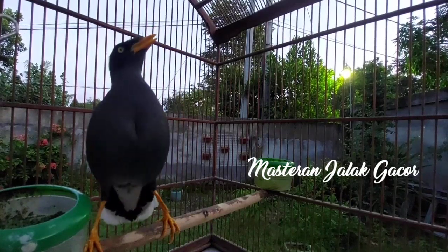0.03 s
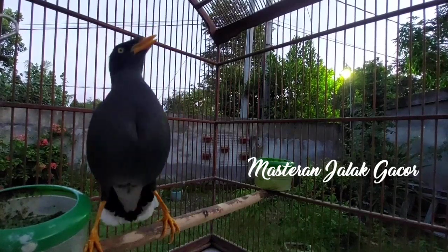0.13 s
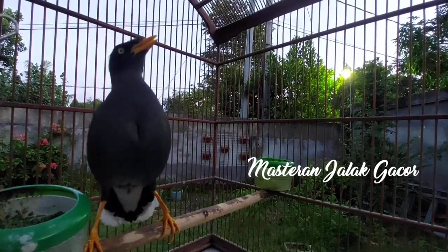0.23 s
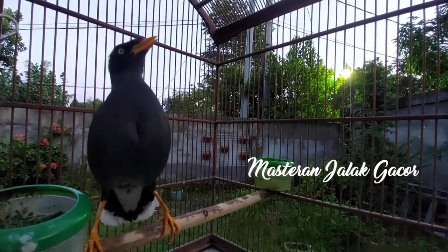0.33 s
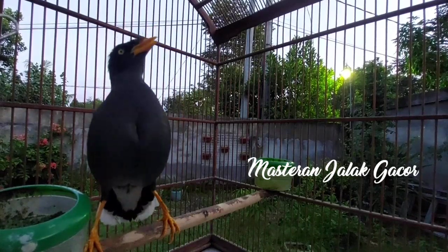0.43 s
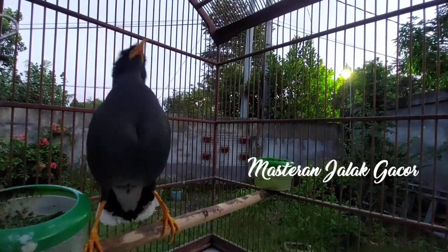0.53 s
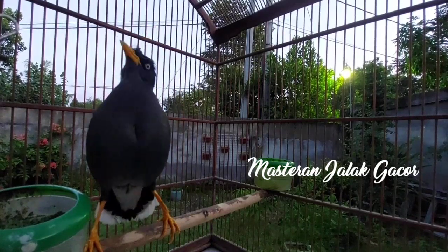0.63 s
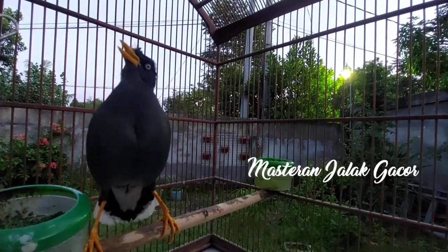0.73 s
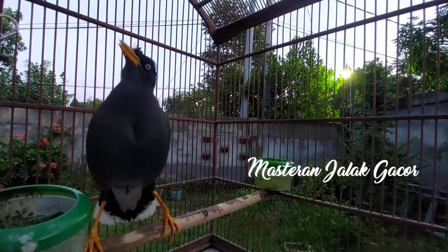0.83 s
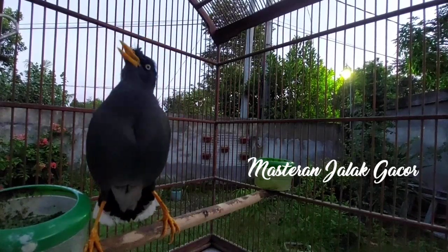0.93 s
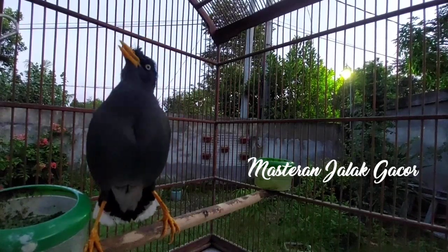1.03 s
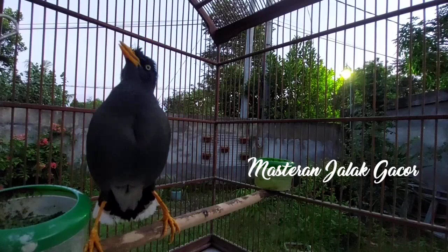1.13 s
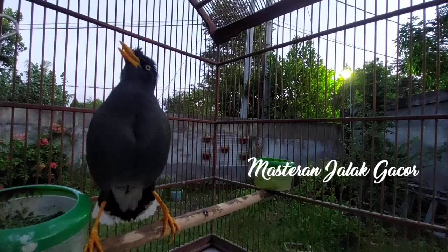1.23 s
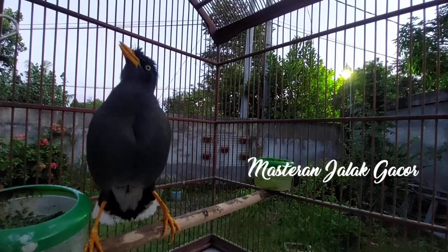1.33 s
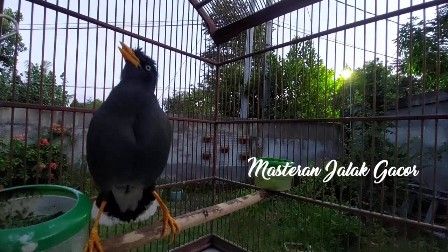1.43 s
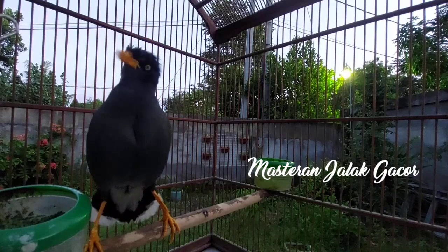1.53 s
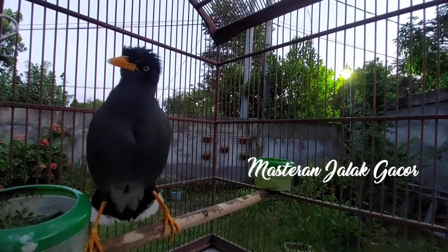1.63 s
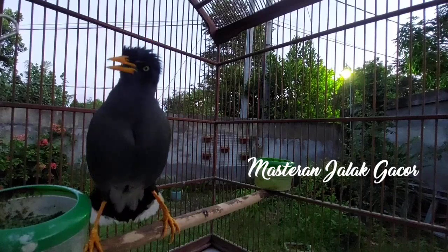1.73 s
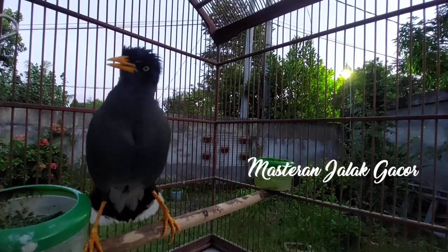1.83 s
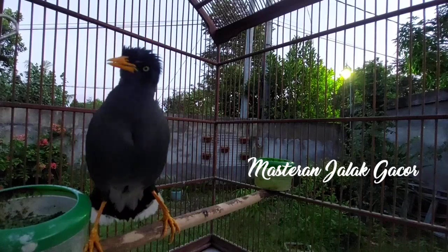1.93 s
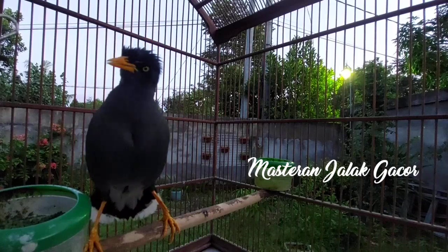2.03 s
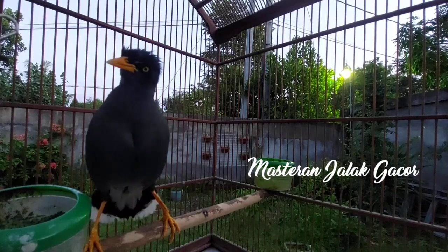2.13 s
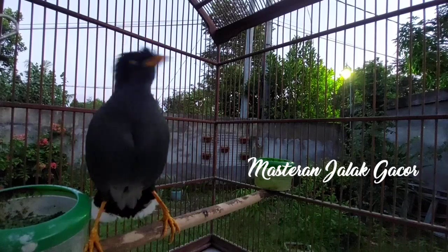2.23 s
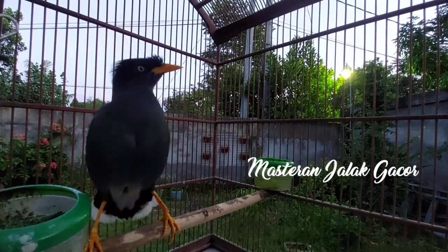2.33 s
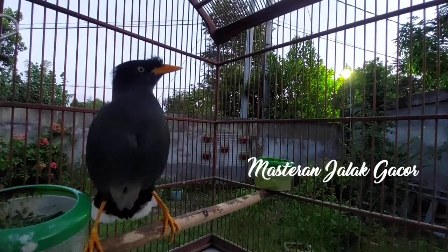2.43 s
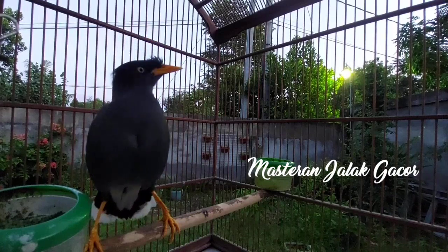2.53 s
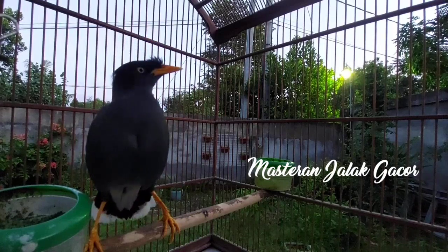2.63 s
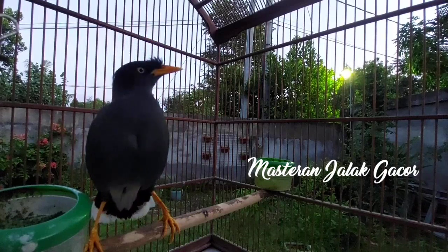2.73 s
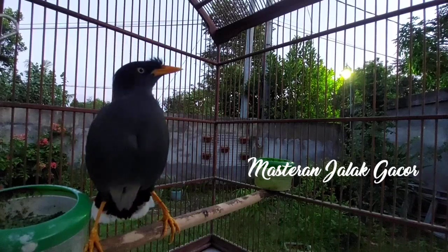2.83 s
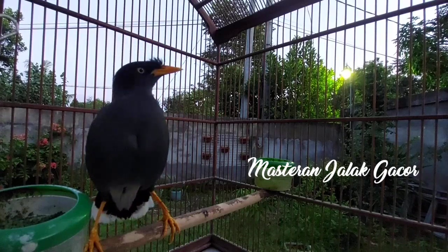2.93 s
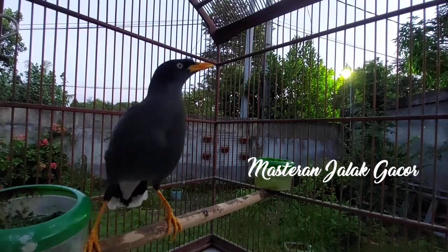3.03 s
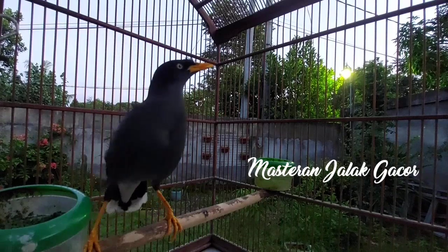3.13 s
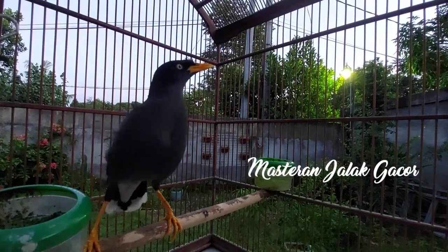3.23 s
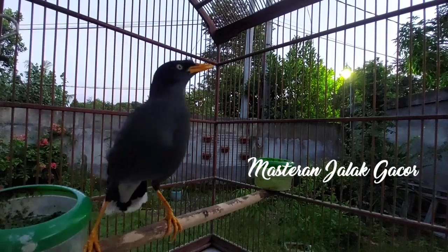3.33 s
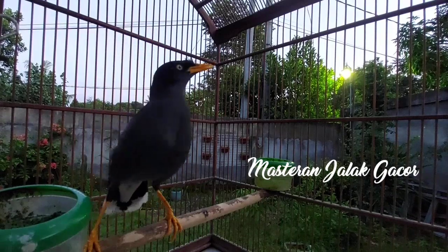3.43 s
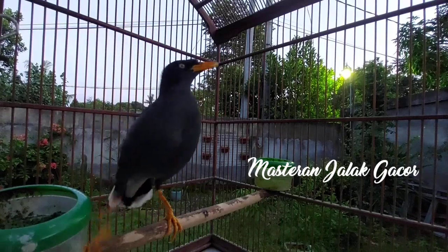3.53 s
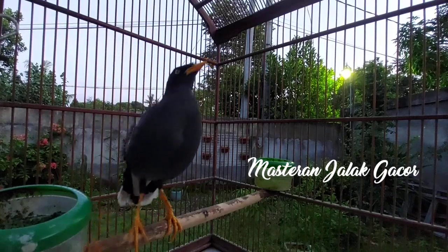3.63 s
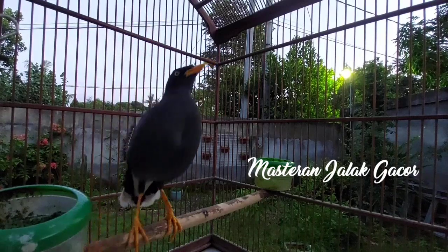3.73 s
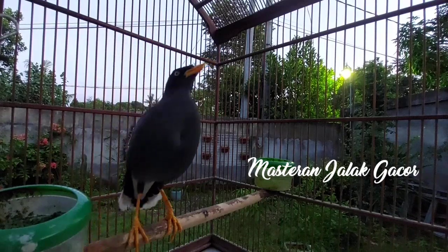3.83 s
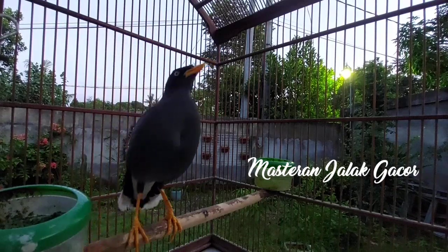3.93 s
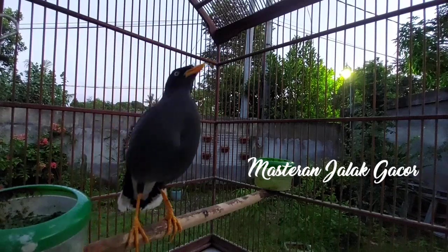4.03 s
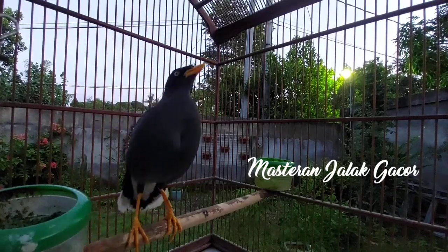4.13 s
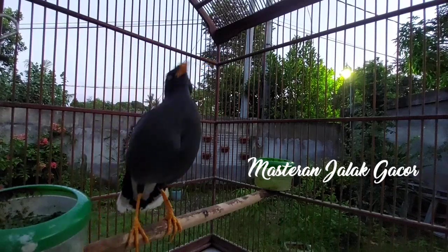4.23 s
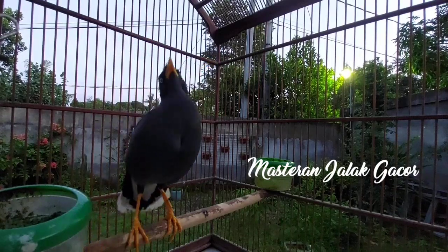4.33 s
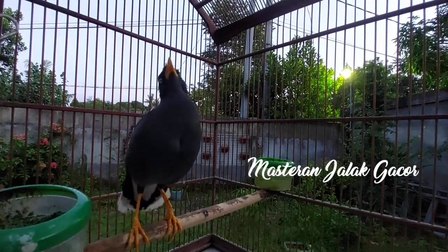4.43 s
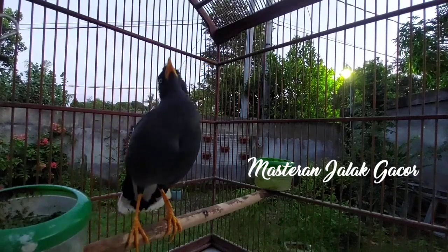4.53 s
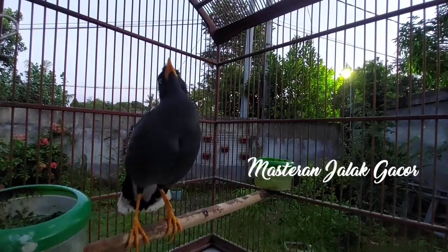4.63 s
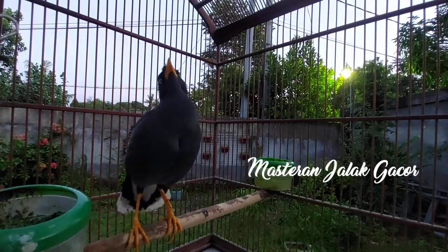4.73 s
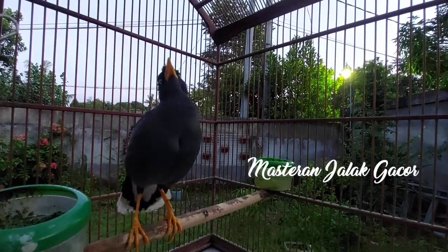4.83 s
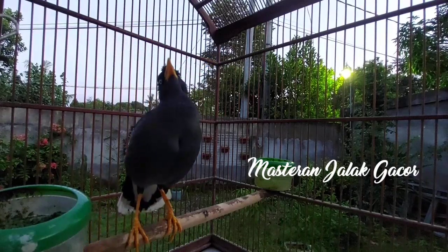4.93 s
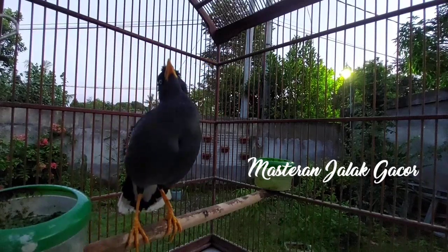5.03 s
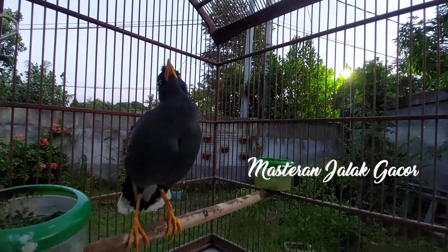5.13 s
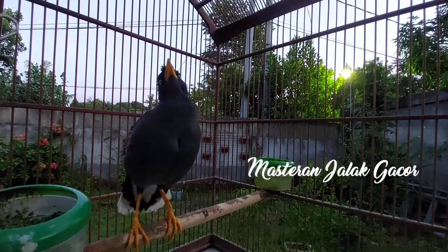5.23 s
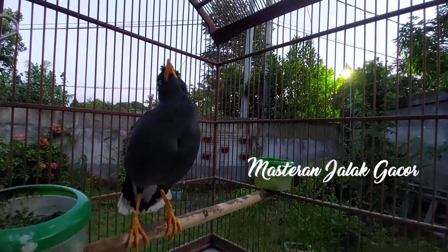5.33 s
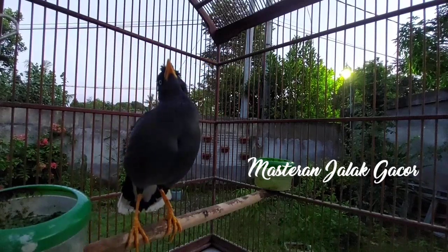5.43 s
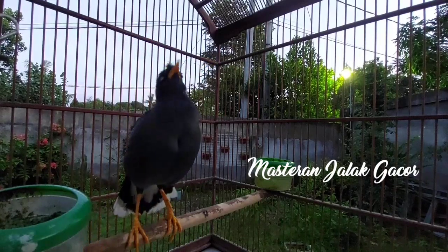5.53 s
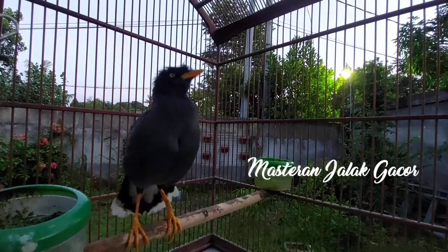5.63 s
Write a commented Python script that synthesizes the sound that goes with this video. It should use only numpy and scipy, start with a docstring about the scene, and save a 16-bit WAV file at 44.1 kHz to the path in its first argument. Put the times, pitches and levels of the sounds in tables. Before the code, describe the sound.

Close stereo pickup of a caged bird outdoors, with short echoes from cage and walls. Yelps and bright whistles fill the first two seconds, then there is a gap of over a second. Dry chucks, quick whistled notes and drawn nasal mews follow. The quiet background of high insect hiss, soft air and low rumble suddenly rises at the chucks, then eases; the cage knocks softly, later more clearly.

```python
"""Caged myna in a garden

A myna sings close by: a chip, yelps, flicks into falling whistles, rasping chucks, a run of quick
notes, two nasal mews. Each is a pitch glide that drives a harmonic buzz and breath through a throat.
The cage knocks twice as decaying modes plus rattle; random echoes answer bird and cage.
Behind: shaped noise for rumble, moving air, a sizzle and pulsed insect hiss, and a far motor of
wavering sines. Rumble, air, hiss and motor jump up just after 3 s.
"""
import sys
import numpy as np
from scipy import signal
from scipy.fft import rfft, irfft
from scipy.io import wavfile
from scipy.ndimage import uniform_filter1d

SR = 44100
rng = np.random.default_rng(int(sys.argv[2]) if len(sys.argv) > 2 else 0)


def materialize(psi):
    """Save the field psi as 16-bit PCM at rate SR to the path in sys.argv[1].

    A 1-D psi becomes a single channel; in a 2-D psi each row is a channel.
    """
    bounded = np.clip(np.atleast_2d(psi).T, -1, 1)
    quanta = np.round(bounded * 32767).astype(np.int16)
    wavfile.write(sys.argv[1], SR, quanta)


N = 250488
TIME = np.arange(N) / SR


def gain_of(db):
    """Decibels to amplitude."""
    return 10 ** (np.asarray(db) / 20)


def evened(x):
    """Scales to rms 1."""
    return x / np.sqrt(np.mean(x ** 2) + 1e-20)


def read(points, hz):
    """Reads a spectrum on a log-frequency axis."""
    f, value = np.transpose(points)
    return np.interp(np.log(hz + 1), np.log(f + 1), value)


def follow(rows, t):
    """Reads every column of a curve at the times t."""
    s, *columns = np.transpose(rows)
    return [np.interp(t, s, c) for c in columns]


def add(mix, s, sound):
    """Mixes a sound in at s seconds."""
    part = mix[max(round(s * SR), 0):][:len(sound)]
    part += sound[:len(part)]


def wander(size, hz):
    """Random motion of rms 1, mostly slower than hz."""
    f = np.fft.rfftfreq(size, 1 / SR)
    return evened(irfft(rfft(rng.standard_normal(size)) / np.sqrt(1 + (f / hz) ** 4), size))


def ease(t, start, end):
    """A smooth step from 0 to 1 between two times."""
    return np.sin(np.pi / 2 * np.clip((t - start) / (end - start), 0, 1)) ** 2


# flutter spells: (from [s], to [s], rate [beats/s], depth [0-1])
FLUTTERS = [(.113, .275, 58.1, .9), (4.13, 4.19, 58, 1)]


def flutter(t):
    """The level beats many times a second, dipping to nothing between beats at depth 1."""
    gain = np.ones(len(t))
    for start, end, rate, depth in FLUTTERS:
        beat = np.sqrt(2) * abs(np.sin(np.pi * rate * (t - start)))
        spell = np.clip(np.minimum(t - start, end - t) / .003, 0, 1)
        gain += depth * (beat - 1) * spell
    return uniform_filter1d(gain, size=60)


def note(t, hz, db, throat, jitter, shimmer, puff_db, rasp_hz):
    """The syrinx buzzes through the throat; as it slackens below rasp_hz its cycles turn uneven."""
    size = len(t)
    rasp = np.clip((rasp_hz - hz) / 110, 0, 1)
    beating = flutter(t)
    # the pitch shakes, most where it slides fast
    slide = np.clip(abs(np.gradient(np.log(hz))) * SR / 20, 0, 1) ** 2
    hz = hz * (1 + (jitter + .018 * slide + .06 * rasp) * wander(size, 600))
    # each beat bends the pitch, unevenly
    hz = hz * (1 + .03 * (beating - 1) * (1 + wander(size, 200)))
    phase = 2 * np.pi * np.cumsum(hz) / SR

    k = np.arange(1, 19)[:, None]
    overtone = k > 1
    # soft blowing and fast slides dull the overtones; high ones flicker one by one
    high = np.clip((k * hz - 3500) / 5000, 0, 1) * overtone
    flicker_db = 3.62 * np.array([wander(size, 49) for _ in k])
    soft_db = 0.36 * (db - db.max())
    heights_db = read(throat, k * hz) + high * (soft_db + flicker_db) - 10 * slide * overtone
    heights = gain_of(heights_db) * (k * hz < SR / 2)
    heights /= np.sqrt((heights ** 2).sum(0) / 2)
    buzz = (heights * np.cos(k * phase + rng.uniform(0, 2 * np.pi, k.shape))).sum(0)
    # strong and weak cycles put half lines between the harmonics
    uneven = 0.5 * rasp * wander(size, 390) * np.cos(phase / 2)
    buzz *= 1 + (shimmer + .12 * slide) * wander(size, 130) + uneven

    # air hisses through once a cycle
    throat_gain = gain_of(read(throat, np.fft.rfftfreq(size, 1 / SR)))
    puff = evened(irfft(rfft(rng.standard_normal(size)) * throat_gain, size))
    puff *= (gain_of(puff_db) + .28 * rasp) * (1 + np.cos(phase))
    puff = signal.sosfilt(signal.butter(3, 1400, "highpass", fs=SR, output="sos"), puff)
    return (buzz + puff) * beating * gain_of(db)


# left over right as the bird turns its head: (time [s], level [dB])
LEAN = [(.2, 4), (.8, 5.5), (1.3, 5.5), (1.7, 7.5), (3.2, 3.5), (3.9, 3.5), (4.3, 3), (4.6, 5), (5.3, 3.5)]


def phrase(gesture, notes, throat, lead_ms, jitter, shimmer, puff_db, rasp_hz=0):
    """Notes of one kind; the bird stands to the left, so that side hears it sooner and louder."""
    voice = np.zeros(N)
    for row in notes:
        add(voice, row[0], note(*gesture(*row), throat, jitter, shimmer, puff_db, rasp_hz))
    late = np.roll(voice, round(lead_ms * SR / 1000))
    left = gain_of(follow(LEAN, TIME)[0])
    return np.array([left * voice, late]) / np.sqrt((left ** 2 + 1) / 2)


def envelope(t, length, attack_s, release_s):
    """The airflow opens, holds and closes (dB)."""
    return 20 * np.log10(ease(t, 0, attack_s) * ease(length - t, 0, release_s) + 1e-4)


def swoop(t, first_hz, top_hz, rise_s):
    """The syrinx tightens: the pitch climbs fast and levels off at its top."""
    return top_hz - (top_hz - first_hz) * np.clip(1 - t / rise_s, 0, 1) ** 2


def settle(t, first_hz, rest_hz, settle_s, wobble):
    """The syrinx relaxes: the pitch falls fast and unsteadily, then creeps to its rest."""
    fall = np.exp(-t / settle_s) * (1 + wobble * wander(len(t), 93))
    return rest_hz + (first_hz - rest_hz) * fall


def weak_spot(hz, centre_hz, width_hz):
    """From 0 to 1: how near a gliding note is to the pitch at which it carries poorly."""
    return np.exp(-((hz - centre_hz) / width_hz) ** 2)


# whistles: (start [s], length [s], plunge above glide [Hz], glide start [Hz], rest before sag [Hz],
#            base level [dB], crest after start [s], fade either side of crest [dB/s], accent [dB])
WHISTLES = [(.111, 0.26, -1, 3420, 2835, -14.5, 0.14, 42, -10),
            (1.536, 0.13, 1899, 3995, 2910, -10, 0.062, 148.5, 3),
            (1.824, 0.1343, 1699.5, 4480, 2863, -8.5, 0.059, 185, 7.5)]
# throat and beak, also for flicks: (frequency [Hz], relative level [dB])
WHISTLE_THROAT = [(2800, 5.5), (4000, -14.5), (5700, -31.5), (7600, -19), (8700, -42), (14500, -47)]


def whistle(start, length, plunge_hz, first_hz, rest_hz, db, crest_s, fade_db_per_s, accent_db,
            plunge_s=0.0047, settle_s=.022, sag_hz_per_s=330, accent_s=0.0068, dip_db=4.0,
            attack_s=0.0089, release_s=0.017):
    """The pitch plunges and settles, then sags; the onset is accented and the level peaks at a crest."""
    t = np.arange(0, length, 1 / SR)
    glide = settle(t, first_hz, rest_hz, settle_s, wobble=0.05)
    hz = glide + plunge_hz * np.exp(-(t / plunge_s) ** 2) - sag_hz_per_s * t
    swell = accent_db * np.exp(-t / accent_s) - fade_db_per_s * abs(t - crest_s)
    swell -= dip_db * weak_spot(hz, centre_hz=3250, width_hz=180)
    return start + t, hz, db + swell + envelope(t, length, attack_s, release_s)


# flicks just before a whistle: (start [s], length [s], top pitch [Hz], level [dB])
FLICKS = [(1.517, 0.021, 5500, -32.5), (1.801, .02, 6330, -30)]


def flick(start, length, top_hz, db, first_hz=3600, attack_s=0.0057, release_s=0.0091):
    """A thin, straight sweep upward."""
    t = np.arange(0, length, 1 / SR)
    hz = first_hz + (top_hz - first_hz) * t / length
    return start + t, hz, db + envelope(t, length, attack_s, release_s)


# quick notes: (start [s], length [s], first pitch [Hz], rest pitch [Hz], base level [dB],
#               crest after start [s], fade either side of crest [dB/s])
QUICK_NOTES = [(4.095, 0.014, 1712, 1700, -31.5, .008, 100), (4.107, 0.087, 3460, 2236, -8.5, 0.042, 330),
               (4.218, 0.094, 3444, 2256, -8, 0.029, 216), (4.329, 0.091, 3400, 2300, -10.5, 0.037, 152.5),
               (4.44, 0.1, 3376, 2220, -13, 0.018, 70), (4.568, 0.088, 3250, 2230, -13.5, 0.032, 103)]
# throat and beak: (frequency [Hz], relative level [dB])
QUICK_THROAT = [(2300, 6), (2650, -9.5), (3200, 1), (4550, -20.5), (5900, -26), (6900, -23.5), (9200, -37),
                (14000, -40)]


def quick_note(start, length, first_hz, rest_hz, db, crest_s, fade_db_per_s, settle_s=.0145,
               strain_db_per_octave=7, dip_db=4, attack_s=0.0078, release_s=0.01284):
    """A short falling whistle, weaker while its pitch is still high."""
    t = np.arange(0, length, 1 / SR)
    hz = settle(t, first_hz, rest_hz, settle_s, wobble=.1)
    swell = -strain_db_per_octave * np.log2(hz / rest_hz) - fade_db_per_s * abs(t - crest_s)
    swell -= dip_db * weak_spot(hz, centre_hz=2656, width_hz=77)
    return start + t, hz, db + swell + envelope(t, length, attack_s, release_s)


# yelps: (start [s], length [s], top pitch [Hz], rise [s], final drop [Hz], level [dB])
YELPS = [(.560, 0.079, 1226, .064, 2, -14.5), (0.801, 0.076, 1187, .056, 31, -16),
         (1.02, .09, 1178, .069, 26, -14.5), (1.265, .079, 1195, .049, 94.5, -13.5)]
# throat and beak: (frequency [Hz], relative level [dB])
YELP_THROAT = [(700, -4), (1200, -20.5), (1800, -5.5), (2400, -1), (3600, 0.5), (4800, -13), (5900, -17),
               (7100, -12), (9500, -30), (15000, -23.5)]


def yelp(start, length, top_hz, rise_s, drop_hz, db, first_hz=630, release_s=0.023):
    """Swells while the pitch climbs, then shuts quickly as the pitch drops."""
    t = np.arange(0, length, 1 / SR)
    hz = swoop(t, first_hz, top_hz, rise_s) - drop_hz * ease(t, length - release_s, length)
    return start + t, hz, db + envelope(t, length, length - release_s, release_s)


# mews: (start [s], length [s], first pitch [Hz], top pitch [Hz], base level [dB])
MEWS = [(4.846, 0.21, 1563, 2046, -20.5), (5.201, 0.24, 1430, 2092, -18.5)]
# throat and beak: (frequency [Hz], relative level [dB])
MEW_THROAT = [(1650, 17), (2050, -14.5), (3500, 10.5), (4100, -1), (5200, 3), (6150, -4.5), (7200, -3.5),
              (8200, -5.5), (10000, -20.5), (12400, -23), (14500, -27)]


def mew(start, length, first_hz, top_hz, db, rise_s=0.09, end_hz=1745, sink_from=0.4, sink_to=0.99,
        attack_s=.015, swell_db=20, swell_s=.066, droop_db=5.0, release_s=0.031):
    """Starts softly and swells as it climbs, then sinks; the level droops with the pitch."""
    t = np.arange(0, length, 1 / SR)
    sink = ease(t / length, sink_from, sink_to)
    hz = swoop(t, first_hz, top_hz, rise_s) + (end_hz - top_hz) * sink
    swell = swell_db * (ease(t, attack_s, swell_s) - 1) - droop_db * sink
    return start + t, hz, db + swell + envelope(t, length, attack_s, release_s)


# chucks: (start [s], length [s], held pitch [Hz], end pitch [Hz], level before fade [dB])
CHUCKS = [(3.15, 0.0729, 1484, 1167, -25), (3.371, 0.084, 1519, 1196, -20.5),
          (3.622, .076, 1560, 1098, -17), (3.872, 0.074, 1490, 1085, -18.5)]
# throat and beak: (frequency [Hz], relative level [dB])
CHUCK_THROAT = [(1100, -9.5), (1520, -4), (2400, 5.5), (3050, 3), (4500, -14.5), (6000, -22), (7500, -21.5),
                (15000, -48)]


def chuck(start, length, held_hz, end_hz, db, sink_from=.25, sink_to=.9, attack_s=0.019,
          fade_db_per_s=45, release_s=0.027):
    """Holds its pitch for the first part of its length, then sinks."""
    t = np.arange(0, length, 1 / SR)
    hz = held_hz + (end_hz - held_hz) * ease(t / length, sink_from, sink_to)
    fade = fade_db_per_s * np.maximum(t - attack_s, 0)
    return start + t, hz, db + envelope(t, length, attack_s, release_s) - fade


# chip: (start [s], length [s], top pitch [Hz], level before fade [dB])
CHIPS = [(0.019, .07, 2172, -24)]
# throat and beak: (frequency [Hz], relative level [dB])
CHIP_THROAT = [(1400, -15), (2150, 2), (4200, 4.5), (6600, -27), (15000, -48)]


def chip(start, length, top_hz, db, first_hz=1300, rise_s=.017, sag_hz_per_s=2600,
         attack_s=0.0081, fade_db_per_s=340, release_s=.01):
    """A snap upward that sags and dies away."""
    t = np.arange(0, length, 1 / SR)
    hz = swoop(t, first_hz, top_hz, rise_s) - sag_hz_per_s * np.maximum(t - rise_s, 0)
    fade = fade_db_per_s * np.maximum(t - attack_s, 0)
    return start + t, hz, db + envelope(t, length, attack_s, release_s) - fade


# knocks on the cage: (time [s], base level [dB])
KNOCKS = [(3.163, -33), (5.617, -24)]
# cage modes: (frequency [Hz], relative level [dB], t60 [s])
CAGE = [(289, -15.5, 0.59), (604, -10.5, 0.12), (873, 2.5, 0.06), (1077, -7.5, 0.1), (1657, 3.5, 0.031),
        (2260, -3, 0.029), (7230, -2, 0.025)]


def knocks(rattle_db=-3, rattle_t60_s=0.15, low_hz=380, high_hz=3200, left_db=2):
    """Each knock rings the cage's modes, with a short noisy rattle of the bars."""
    out, t = np.zeros((2, N)), np.arange(SR // 3) / SR
    band = signal.butter(2, [low_hz, high_hz], "bandpass", fs=SR)
    for s, db in KNOCKS:
        ring = sum(gain_of(level - 60 * t / t60) * np.sin(2 * np.pi * (hz * t + rng.random()))
                   for hz, level, t60 in CAGE)
        for side, lean_db in zip(out, (left_db, 0)):
            rattle = evened(signal.lfilter(*band, rng.standard_normal(len(t))))
            rattle *= gain_of(rattle_db - 60 * t / rattle_t60_s)
            add(side, s, gain_of(db + lean_db) * (ring + rattle) * np.minimum(t / .002, 1))
    return out


# garden ring time: (frequency [Hz], t60 [s])
GARDEN = [(500, .45), (2500, 0.38), (15000, .2)]


def garden(x, near_db=-23, near_t60_s=0.045, far_db=-24.5):
    """Quick echoes off the cage and its tray, then a thin tail from walls and trees."""
    t = np.arange(SR) / SR
    sparse = rng.random((2, SR)) < 2500 / SR
    taps = rng.standard_normal((2, SR)) * sparse * (t > .002)
    near = taps * gain_of(-60 * t / near_t60_s)
    hz, s, z = signal.stft(taps * (t > .015), SR, nperseg=256)
    decay = gain_of(-60 * s / read(GARDEN, hz)[:, None])
    far = signal.istft(z * decay, SR, nperseg=256)[1][:, :SR]
    echoes = gain_of(near_db) * near / np.linalg.norm(near[0])
    echoes += gain_of(far_db) * far / np.linalg.norm(far[0])
    # the left side feeds both echo channels
    return signal.fftconvolve(x[:1], echoes, axes=1)[:, :N]


# backgrounds between the ears: (frequency [Hz], correlation [-1 to 1])
LIKENESS = [(100, 0.82), (300, .85), (800, -0.17), (2000, 0)]


def background(spectrum, level, patchy_db, lines_db, left_db):
    """Shaped noise with drifting patches and thin lasting tones, partly alike in both ears."""
    hz = np.fft.rfftfreq(2048, 1 / SR)
    a, b, c, d, patches, lines = rng.standard_normal((N // 512 + 5, len(hz), 6)).T
    patches = evened(smear(patches, 14, 5))
    lines = evened(smear(lines, 2, 60))
    same, left = np.clip(read(LIKENESS, hz), -1, 1)[:, None], a + 1j * b
    right = same * left + np.sqrt(1 - same ** 2) * (c + 1j * d)
    z = np.array([left * gain_of(left_db), right])
    z *= gain_of(read(spectrum, hz)[:, None] + patchy_db * patches + lines_db * lines)
    noise = signal.istft(z, nperseg=2048, noverlap=1536)[1][:, :N]
    return gain_of(follow(level, TIME)[0]) * evened(noise)


def smear(grid, bins, frames):
    """Smooths a noise grid over frequency bins and time frames."""
    return uniform_filter1d(uniform_filter1d(grid, size=bins, axis=0), size=frames, axis=1)


# insect hiss spectrum: (frequency [Hz], relative level [dB])
HISS = [(5000, -48), (6800, -21), (7450, -1), (8200, -17.5), (9500, -17.5), (10900, 2.5), (12100, -20.5),
        (12700, -53), (15000, -34.5)]
# (time [s], level [dB])
HISS_LEVEL = [(0, -53.5), (1.901, -57.5), (3.08, -59.5), (3.2, -49.5), (4, -52), (4.8, -57.5),
              (5.68, -57.5)]


def insects(depth=0.51, strokes_per_s=138.8):
    """The high hiss comes in fast strokes, as from a scraping insect."""
    strokes = np.cumsum(strokes_per_s * (1 + .004 * wander(N, 3))) / SR
    beat = 1 + depth * np.cos(2 * np.pi * strokes)
    return evened(beat) * background(HISS, HISS_LEVEL, patchy_db=-2.5, lines_db=0.5, left_db=9.5)


# sizzle spectrum: (frequency [Hz], relative level [dB])
SIZZLE = [(3500, -31), (5200, -4), (7200, 4), (9500, -24)]
# (time [s], level [dB])
SIZZLE_LEVEL = [(0, -53.5), (1.9, -54.5), (3.099, -61), (5.68, -67)]


def sizzle():
    """Unpulsed treble noise with thin tones, fading over the scene."""
    return background(SIZZLE, SIZZLE_LEVEL, patchy_db=1.5, lines_db=4.5, left_db=0)


# moving-air spectrum: (frequency [Hz], relative level [dB])
AIR = [(100, 4.5), (900, 2), (2600, -3.5), (4000, -5.5), (9500, -19), (13500, -35), (15000, -32)]
# (time [s], level [dB])
AIR_LEVEL = [(0, -53), (1.9, -60.5), (2.3, -69), (3.08, -68.5), (3.179, -45.5), (4, -49), (4.75, -57),
             (5.68, -57.5)]


def air():
    """Moving air: broad noise that falls off toward the treble."""
    return background(AIR, AIR_LEVEL, patchy_db=2, lines_db=1, left_db=1)


# rumble spectrum: (frequency [Hz], relative level [dB])
RUMBLE = [(20, -39), (45, -23.5), (65, 4.5), (130, -7), (260, -14.5), (350, -6), (450, -20.5), (700, -12.5),
          (1500, -40)]
# (time [s], level [dB])
RUMBLE_LEVEL = [(0, -50), (1.6, -44.5), (2.6, -50), (3.079, -48), (3.181, -41.5), (4.1, -41),
                (4.599, -48.5), (5.68, -47)]


def rumble():
    """Low noise, strongest near 65 Hz."""
    return background(RUMBLE, RUMBLE_LEVEL, patchy_db=2, lines_db=4.5, left_db=1.3)


# far motor: (time [s], firing rate [Hz], level [dB])
MOTOR = [(1.2, 62.62, -54.5), (3.08, 64, -63), (3.2, 69.5, -40.5), (4, 69.84, -41), (4.7, 67.06, -48.5),
         (5, 102.9, -52.5), (5.3, 94.5, -49.5), (5.68, 103.5, -50.5)]
# partials: (multiple of firing rate, relative level [dB])
MOTOR_ORDERS = [(1, 0.5), (2, -6.5), (2.5, -16)]


def motor(waver=0.014, throb=.25):
    """The low orders of a far engine, wavering in pitch and level."""
    hz, db = follow(MOTOR, TIME)
    phase = 2 * np.pi * np.cumsum(hz * (1 + waver * wander(N, 5.5))) / SR
    hum = sum(gain_of(level) * np.sin(k * phase) * (1 + throb * wander(N, 6.83))
              for k, level in MOTOR_ORDERS)
    return gain_of(db) * evened(hum)


def scene():
    """The bird and its cage in the garden."""
    near = knocks()
    for gesture, notes in (whistle, WHISTLES), (flick, FLICKS):
        near += phrase(gesture, notes, WHISTLE_THROAT, lead_ms=0.23, jitter=0.00059, shimmer=.03,
                       puff_db=-50.5)
    near += phrase(quick_note, QUICK_NOTES, QUICK_THROAT, lead_ms=0.13, jitter=0.001, shimmer=0.012,
                   puff_db=-51)
    near += phrase(yelp, YELPS, YELP_THROAT, lead_ms=.22, jitter=.009, shimmer=.14,
                   puff_db=-18, rasp_hz=900)
    near += phrase(mew, MEWS, MEW_THROAT, lead_ms=.17, jitter=0.00063, shimmer=0.081, puff_db=-40.5)
    near += phrase(chuck, CHUCKS, CHUCK_THROAT, lead_ms=.13, jitter=.005, shimmer=.09,
                   puff_db=-26, rasp_hz=1370)
    near += phrase(chip, CHIPS, CHIP_THROAT, lead_ms=.2, jitter=.004, shimmer=.2, puff_db=-28)
    return near + garden(near) + insects() + sizzle() + air() + rumble() + motor()


def record(dry, edge_hz=15750):
    """Band limit: a steep linear-phase low-pass."""
    lowpass = signal.firwin(511, edge_hz, window=("kaiser", 9), fs=SR)
    return signal.oaconvolve(dry, lowpass[None], "same")


dry = scene()
out = record(dry)
materialize(out)
```